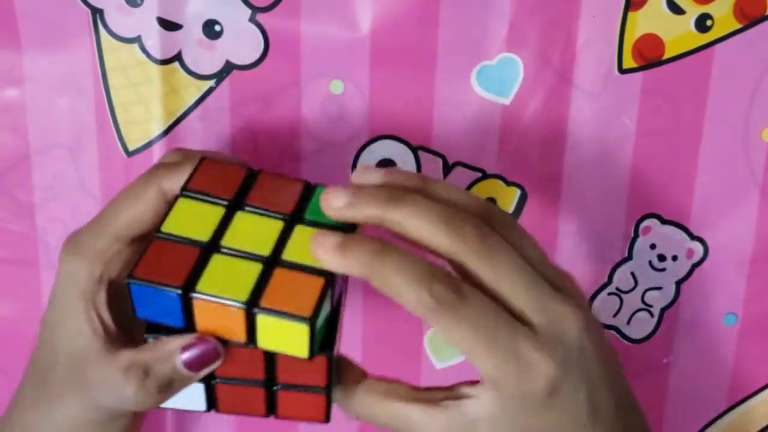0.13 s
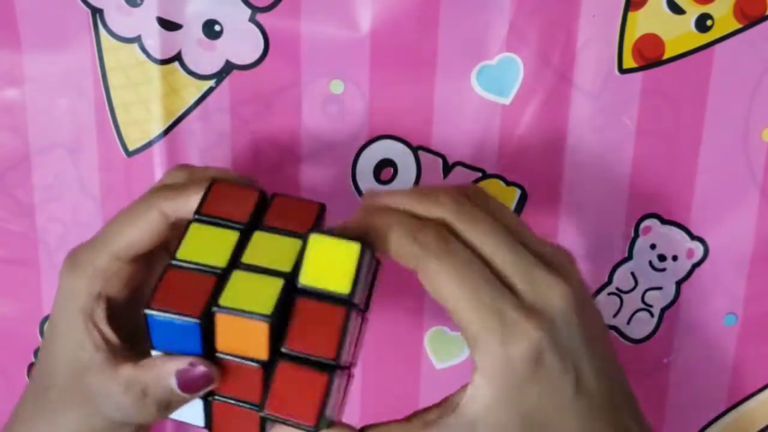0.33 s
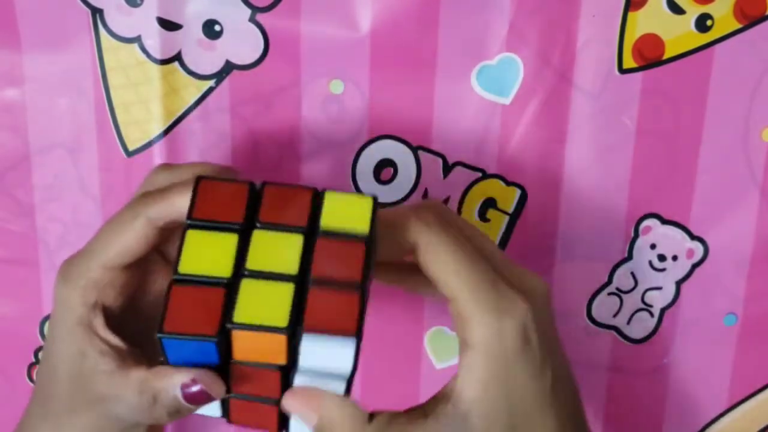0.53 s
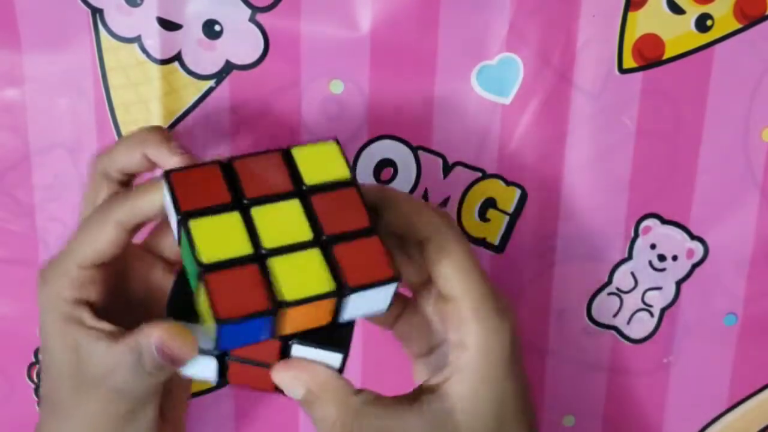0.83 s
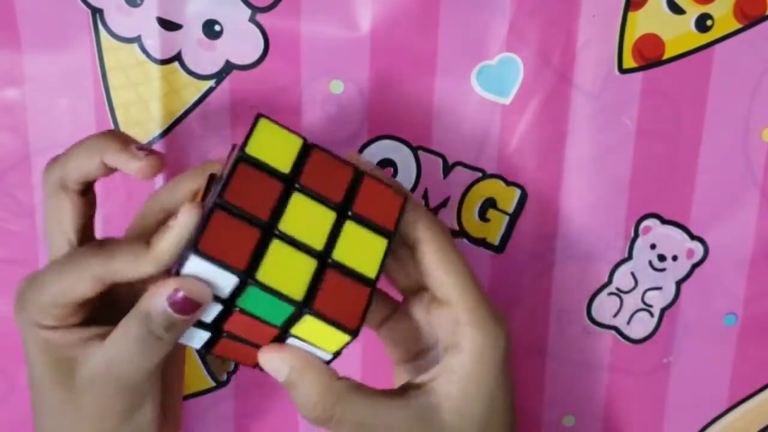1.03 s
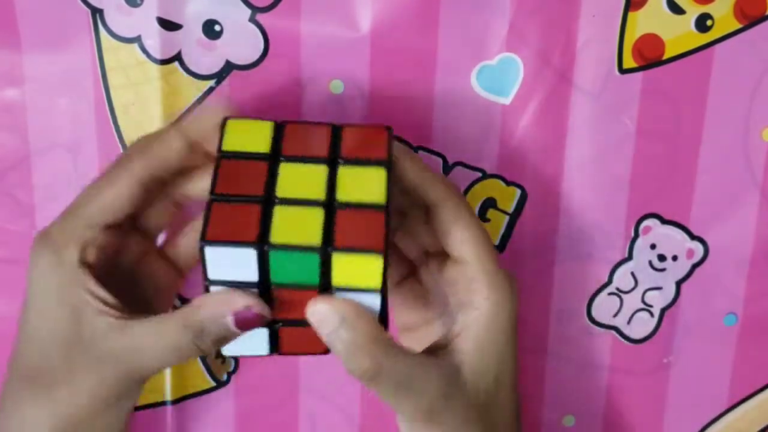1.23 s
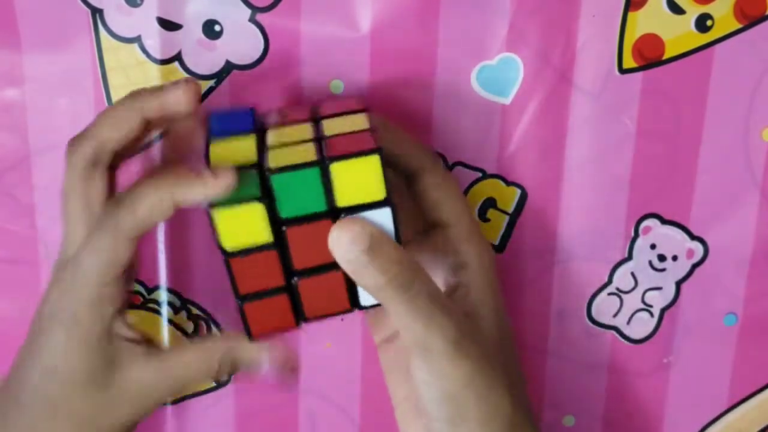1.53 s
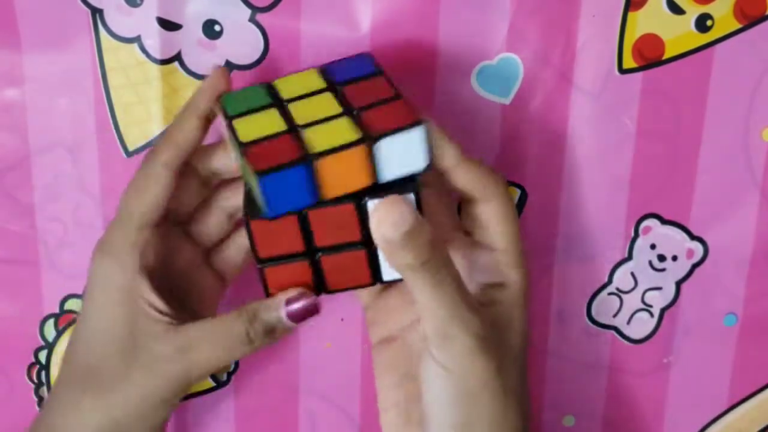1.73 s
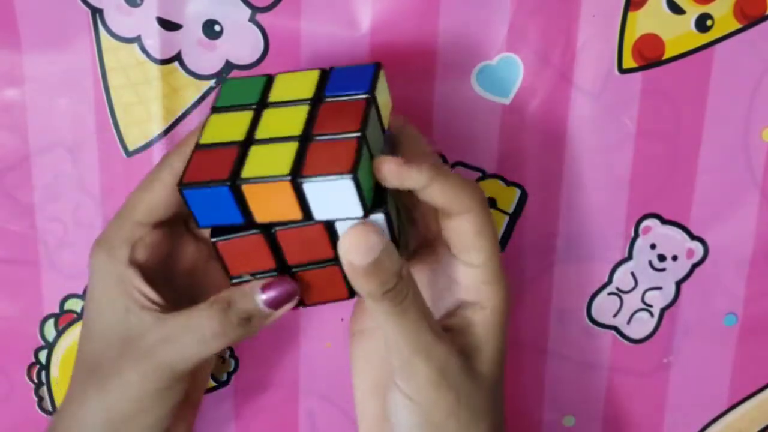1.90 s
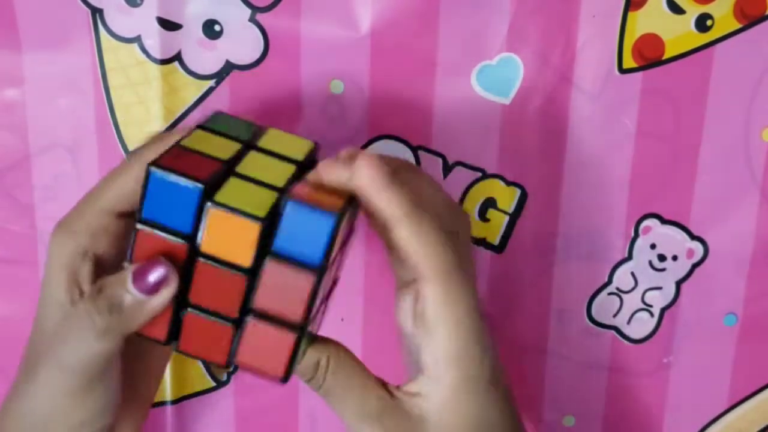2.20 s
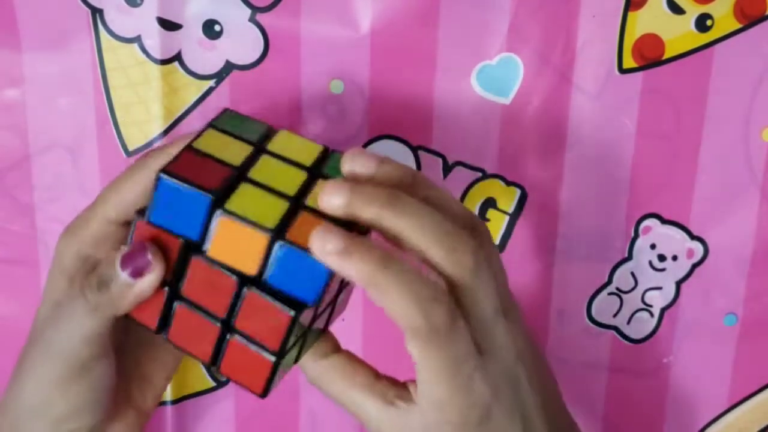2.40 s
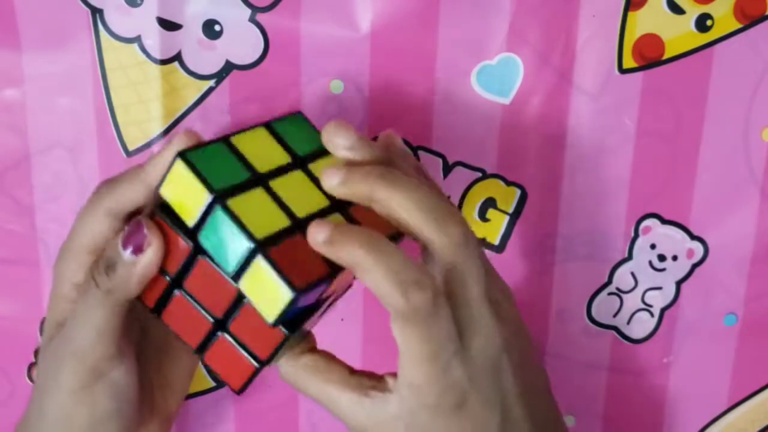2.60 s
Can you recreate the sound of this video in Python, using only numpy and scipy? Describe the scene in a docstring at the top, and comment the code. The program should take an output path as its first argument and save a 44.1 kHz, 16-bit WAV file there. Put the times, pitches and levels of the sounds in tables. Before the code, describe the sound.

A plastic puzzle cube is twisted close to the microphones in a small room. Its loose pieces clack in quick runs, pause briefly, then rattle more busily with light scraping. Hands rustle softly over a faint low hum.

```python
"""Twisting a plastic puzzle cube

The cube is turned by hand close to two microphones in a small room. Its loose pieces knock together
in quick runs. Each knock is a scatter of tiny contacts that rings the whole body, the hollow core,
the shells of the pieces and their hard edges. The layers rub between knocks, and now and then a piece
snaps into its seat. The hands rustle softly; a low hum, rumble and faint hiss lie underneath."""
import sys
import numpy as np
from scipy import signal
from scipy.fft import rfft, irfft, next_fast_len
from scipy.io import wavfile

SR = 44100
rng = np.random.default_rng(int(sys.argv[2]) if len(sys.argv) > 2 else 0)


def unload_wav(signal):
    """Save mono or channel-first audio to the path in sys.argv[1] as 16-bit WAV at rate SR, clipped to [-1, 1]."""
    wavfile.write(
        sys.argv[1],
        SR,
        np.round(np.clip(np.atleast_2d(signal).T, -1, 1) * 32767).astype(np.int16),
    )


N = 121275
T = np.arange(N) / SR

# tones of the electric hum: (frequency [Hz], level [dB])
HUM_TONES = [(49.5, -60.5), (141, -82.5)]
# colour of the rumble, from low to high: (frequency [Hz], relative level [dB])
RUMBLE_COLOUR = [(20, -5), (33, 1), (49, 12), (62, 6.5), (85, 1.5), (120, -12.5), (200, -20), (400, -47.5)]
# colour of the hiss: (frequency [Hz], relative level [dB])
HISS_COLOUR = [(150, 6.5), (400, -1), (900, -9), (1500, -2.5), (2500, 3), (3100, -12), (4500, -17),
               (8000, -36), (12000, -17.5), (16000, -21)]
# the hands shift their grip: (time [s], half length [s], level [dB])
GRIP_SHIFTS = [(0.647, 0.042, -65.5), (0.806, 0.068, -64.5), (1.272, 0.05, -64.5), (2.641, 0.046, -60)]
# colour of their rustle: (frequency [Hz], relative level [dB])
RUSTLE_COLOUR = [(60, -15), (140, 17.5), (200, 2), (320, -7.5), (700, -15), (2000, -48)]
# the room's echo: (frequency [Hz], level [dB], time to fade by 60 dB [s])
ROOM_BANDS = [(300, 3, 0.36), (730, 1, 0.92), (1640, -11, 0.44), (3100, -5.5, 0.4), (5500, -5.5, 0.44),
              (10400, -8.5, 0.49), (15500, -4, 0.38)]
# colour of the two microphones: (frequency [Hz], left gain [dB], right gain [dB])
MIC_COLOUR = [(487, -3, -8), (1370, 3.5, 1), (2450, 4, -2.5), (4390, -5.5, -9), (6080, 3, -4),
              (7560, 3.5, -10.5), (8730, -2.5, 1), (10230, -2, 6), (12100, 1.5, 3), (15900, -6, -8)]
# low ringing tones, or modes, of the whole cube: (frequency [Hz], relative level [dB], fade time [s])
BODY_MODES = [(518, -18, 0.039), (795, -5, 0.015), (935, -0.5, 0.0096), (1107, 2, 0.011)]
# ring of the hollow core: (frequency [Hz], relative level [dB], fade time [s])
HOLLOW_MODES = [(1258, -7, 0.0097), (1416, 1, 0.0077), (1642, 2.5, 0.0059), (1963, -0.5, 0.0056)]
# ring of the pieces' shells: (frequency [Hz], relative level [dB], fade time [s])
SHELL_MODES = [(2168, -0.5, 0.0024), (2624, -3, 0.0058), (2944, 1.5, 0.0036), (3545, -2.5, 0.006),
               (4060, -8, 0.0039)]
# ring of their hard edges: (frequency [Hz], relative level [dB], fade time [s])
EDGE_MODES = [(4470, -2.5, 0.0026), (6120, -1.5, 0.0022), (6710, -2, 0.0026), (9870, 1, 0.0018),
              (10630, 1.5, 0.0015), (11940, 3, 0.0015), (13270, 6, 0.0011), (15040, 3.5, 0.0014)]
# the body's ring against the hollow's, as the grip changes: (time [s], relative level [dB])
BODY_LEVELS = [(0.21, -15), (0.35, -13.5), (0.81, -15), (1.35, -12), (1.375, -8.5), (1.46, -4.5),
               (1.68, -15.5), (1.705, -7.5), (2.0, -8.5), (2.17, -12.5), (2.42, -15.5), (2.56, -7)]
# longer turns, where a layer scrapes on between knocks: (middle time [s])
SLIDE_TIMES = [1.38, 1.7, 2.09, 2.51]
# pieces snap into their seats: (time [s], frequency [Hz], fade time [s], relative level [dB])
SEAT_SNAPS = [(0.6064, 3100, 0.0065, -51.5), (1.7018, 3730, 0.0043, -28.5), (1.8131, 3200, 0.0045, -27.5),
              (2.1961, 13200, 0.0011, -32), (2.4675, 10400, 0.0023, -41.5)]
# knocks of the pieces, with relative levels: (time [s], scatter length [s],
# pitch the hollow leans toward [Hz], hollow level [dB], shell level [dB], edge level [dB])
PIECE_KNOCKS = [(0.119, 0.0012, 1510, -72, -81, -74), (0.1606, 0.0011, 1710, -53.5, -59, -72),
                (0.2113, 0.0018, 1470, -35, -36, -38.5), (0.243, 0.0009, 1620, -45.5, -81, -78),
                (0.3075, 0.0029, 1810, -43.5, -44.5, -55), (0.3194, 0.002, 1570, -41.5, -53, -62),
                (0.3232, 0.0009, 1720, -32.5, -40, -41), (0.3258, 0.0024, 1730, -45, -38, -34.5),
                (0.3301, 0.00093, 1680, -55, -52, -38), (0.338, 0.00062, 1496, -26.5, -34, -31.5),
                (0.3412, 0.0016, 1590, -51, -28, -33), (0.3466, 0.0018, 1530, -28.5, -32.5, -43),
                (0.35, 0.0024, 1640, -35.5, -48, -30), (0.4511, 0.0017, 1500, -45.5, -49.5, -46.5),
                (0.4549, 0.0019, 1460, -43.5, -48, -44.5), (0.5345, 0.0017, 1410, -48, -59, -67),
                (0.583, 0.0015, 1500, -45, -53.5, -54.5), (0.6078, 0.00034, 1514, -46, -48, -48.5),
                (0.676, 0.0013, 1630, -59, -63.5, -69), (0.7973, 0.0052, 1640, -53.5, -62, -56),
                (0.8157, 0.0032, 1880, -33.5, -41.5, -37.5), (0.8381, 0.0014, 1590, -56, -49, -95),
                (0.848, 0.0017, 1570, -40.5, -40.5, -42), (0.9454, 0.0038, 1870, -37, -41.5, -41.5),
                (0.9495, 0.0015, 1840, -48.5, -55, -68), (0.9565, 0.001, 1680, -41, -54, -41.5),
                (0.963, 0.0016, 1440, -42, -46.5, -37.5), (0.9816, 0.0019, 1560, -47, -51, -53),
                (1.2512, 0.0012, 1850, -59.5, -68, -61.5), (1.2917, 0.0013, 1800, -55, -67, -56.5),
                (1.3239, 0.0027, 1930, -39.5, -48, -47.5), (1.3502, 0.0013, 1550, -35.5, -45.5, -40),
                (1.358, 0.0026, 1750, -41, -44, -45), (1.3733, 0.0017, 1510, -36, -35.5, -37),
                (1.383, 0.0024, 1590, -44.5, -49, -43.5), (1.4135, 0.0065, 1530, -49.5, -52, -52),
                (1.4372, 0.0012, 1810, -40, -37.5, -42), (1.4609, 0.0011, 1180, -46.5, -55, -52),
                (1.547, 0.005, 1510, -55, -62, -55.5), (1.5783, 0.00067, 1560, -48.5, -62, -58),
                (1.598, 0.001, 1790, -41.5, -44, -56), (1.6007, 0.0012, 1710, -39, -46.5, -55),
                (1.6409, 0.0053, 1670, -42, -48, -50), (1.6875, 0.0038, 1620, -34, -39, -35.5),
                (1.6933, 0.0038, 1380, -38, -43, -35), (1.7013, 0.00073, 1386, -30.5, -31.0, -33),
                (1.7159, 0.0035, 1395, -35.5, -35, -36), (1.7281, 0.0026, 1440, -40, -44, -40),
                (1.783, 0.0035, 1460, -49, -50.5, -55), (1.8125, 0.0014, 1500, -38.5, -33.5, -34),
                (1.8328, 0.0018, 1550, -47.5, -58, -48.5), (1.9157, 0.0024, 1490, -49.5, -45, -67),
                (1.9536, 0.0027, 1360, -52, -55, -62), (1.9941, 0.0036, 1150, -53, -61.5, -71),
                (2.0563, 0.0041, 1980, -36, -42.5, -38.5), (2.059, 0.0037, 1350, -35, -34, -43),
                (2.0867, 0.0037, 1500, -40, -44, -47), (2.1397, 0.0024, 1500, -53, -54, -71),
                (2.1667, 0.0026, 1630, -38.5, -41, -47), (2.1961, 0.001, 1670, -46, -43, -30.5),
                (2.255, 0.0043, 1550, -46.5, -55.5, -52.5), (2.31, 0.00092, 1250, -50, -50.5, -55),
                (2.4178, 0.0034, 1660, -37, -44.5, -42), (2.458, 0.0059, 1460, -40.5, -41, -50),
                (2.4669, 0.0011, 1630, -46.5, -56, -33.5), (2.4701, 0.0012, 1640, -38, -43.5, -47),
                (2.4891, 0.00087, 1460, -48, -50, -60), (2.5055, 0.0054, 1410, -44, -59, -50),
                (2.5293, 0.0021, 1830, -48, -54, -50), (2.5392, 0.0013, 1410, -45, -50, -95),
                (2.547, 0.0016, 1460, -45, -50, -56), (2.5561, 0.0034, 1630, -50.5, -47.5, -45),
                (2.6906, 0.0032, 1800, -54.5, -60.5, -73)]

RUMBLE_DB, HISS_DB = -55.5, -68
ROOM_DELAY_S, EARLY_ECHO_DB, EARLY_ECHO_S = 0.0014, -0.5, 0.011
RUB_DB, GRAINS_PER_S, GRAIN_SPREAD_DB = -60.5, 1200, 6.5
RUB_REACH_S, RUB_FOLLOWS = 0.0055, 0.87   # rubbing gains 0.87 dB for each dB of a nearby knock
RUB_BODY_DB, RUB_SHELL_DB, RUB_EDGE_DB = 5.5, -7, -8
SLIDE_S, SLIDE_DB = 0.048, -53
CONTACTS_PER_S, CONTACT_SPREAD_DB, MODE_SPREAD_DB = 9000, -0.5, 1.5
RUN_UP_S, BLOW_SHARE, BLOW_DB = .007, 0.21, 8.5   # the main contact; shares are of the scatter length
LEAD_SHARE, LEAD_DB, CHATTER_SHARE, CHATTER_DB = .45, -2, 1.05, -2.5
HOLLOW_HZ, PITCH_FOLLOWS = 1612, 0.45   # the hollow's usual pitch, and how far it leans away
PIECE_SPREAD = 0.061   # the pieces differ in pitch by up to this share
HOLLOW_DB, SHELL_DB, EDGE_DB = -0.32, 3, -1.3
HOLLOW_SIDE_DB, SHELL_SIDE_DB, EDGE_SIDE_DB = -38, -8.5, 1   # higher: left and right differ more
KNOCK_S = .003   # a click's level is set as if all its energy fell within this time
SNAP_ROOM_DB, CUTOFF_HZ = -43, 16400


def from_db(db):
    """Turn decibels into a number to multiply by."""
    return 10 ** (np.asarray(db) / 20)


def unit_power(x):
    """Scale a sound to an average power of 1."""
    return x / np.sqrt(np.mean(x ** 2) + 1e-20)


def at_hz(table, hz, column=1):
    """Read a table between its rows, with every octave equally wide."""
    rows = np.array(table)
    return np.interp(np.log(np.maximum(hz, 1)), np.log(rows[:, 0]), rows[:, column])


def noise(colour, alike):
    """Stereo noise of a given colour; alike runs from 0 (unrelated sides) to 1 (the same)."""
    gains = from_db(at_hz(colour, np.fft.rfftfreq(N, 1 / SR)))
    mid, side = irfft(rfft(rng.standard_normal((2, N))) * gains, N)
    return unit_power(np.sqrt(1 + alike) * mid + np.sqrt(1 - alike) * side * [[1], [-1]])


def background():
    """Steady electric hum, low rumble and faint hiss."""
    hum = sum(from_db(db) * np.sqrt(2) * np.sin(2 * np.pi * (hz * T + rng.random()))
              for hz, db in HUM_TONES)
    rumble = from_db(RUMBLE_DB) * noise(RUMBLE_COLOUR, alike=0.92)
    hiss = from_db(HISS_DB) * noise(HISS_COLOUR, alike=0.25)
    return hum + rumble + hiss


def hands():
    """Soft swells of low rustle as the hands shift on the cube."""
    swell = sum(from_db(db) * np.exp(-.5 * ((T - s) / width) ** 2) for s, width, db in GRIP_SHIFTS)
    return swell * noise(RUSTLE_COLOUR, alike=0.99)


def room_echo(size=32768):
    """Dense reflections, strongest at first; each band of frequencies fades at its own speed."""
    t, hz = np.arange(size) / SR, np.fft.rfftfreq(size, 1 / SR)
    white, out = rfft(rng.standard_normal((2, size))), 0
    centres = np.log([row[0] for row in ROOM_BANDS])
    early_boost = 1 + from_db(EARLY_ECHO_DB) * np.exp(-t / EARLY_ECHO_S)
    for share, (_, db, fade_s) in zip(np.eye(len(ROOM_BANDS)), ROOM_BANDS):
        band = irfft(white * np.interp(np.log(hz + 1), centres, share))
        fade = np.exp(-np.log(1000) * t / fade_s) * (t > ROOM_DELAY_S) * early_boost
        out = out + from_db(db) * band * fade / np.sqrt(np.sum(fade ** 2))
    return out


def microphones(cube):
    """Two microphones hear the cube directly and as echo. Its rows: left, right, into the room."""
    size = next_fast_len(N + 32768)
    hz, spectrum = np.fft.rfftfreq(size, 1 / SR), rfft(cube, size)
    colour = from_db([at_hz(MIC_COLOUR, hz, column=1), at_hz(MIC_COLOUR, hz, column=2)])
    echo = spectrum[2] * rfft(room_echo(), size)
    return irfft(colour * (spectrum[:2] + echo), size)[:, :N]


def ring(contacts, modes, pitch=1, spread_db=0):
    """Each contact starts a set of fading tones, whose strengths may vary by chance."""
    out = 0
    for k, (hz, db, fade_s) in enumerate(modes):
        decay, angle = from_db(-60 / (fade_s * SR)), 2 * np.pi * hz * pitch / SR   # per sample
        gain = from_db(db + spread_db * rng.standard_normal()) * (-1) ** k
        feedback = [1, -2 * decay * np.cos(angle), decay * decay]
        out = out + gain * signal.lfilter([1, 0, -1], feedback, contacts + 1e-18)
    return out


def body_db(s):
    """How strongly the grip lets the body ring at a given time."""
    return np.interp(s, *np.transpose(BODY_LEVELS))


def rubbing():
    """Sliding layers catch in faint grains, around the knocks and through the longer turns."""
    near_knocks = sum(from_db(2 * RUB_FOLLOWS * hollow_db) * np.exp(-np.abs(T - s) / RUB_REACH_S)
                      for s, _, _, hollow_db, _, _ in PIECE_KNOCKS)
    in_turns = sum(from_db(2 * RUB_FOLLOWS * SLIDE_DB) * np.exp(-.5 * ((T - s) / SLIDE_S) ** 2)
                   for s in SLIDE_TIMES)
    sizes = from_db(GRAIN_SPREAD_DB * np.minimum(rng.exponential(1, N), 3)) * rng.choice([-1, 1], N)
    grains = (rng.random(N) < GRAINS_PER_S / SR) * sizes * np.sqrt(near_knocks + in_turns)
    parts = [(BODY_MODES, RUB_BODY_DB + body_db(T)), (HOLLOW_MODES, 0),
             (SHELL_MODES, RUB_SHELL_DB), (EDGE_MODES, RUB_EDGE_DB)]
    return sum(from_db(RUB_DB + db) * unit_power(ring(grains, modes)) for modes, db in parts)


def snaps(size=2048):
    """A piece snaps into its seat with one clear ring and almost no echo."""
    out = np.zeros(N + size)
    for s, hz, fade_s, db in SEAT_SNAPS:
        mode, start = [(hz, 0, fade_s)], int(s * SR)
        click = ring(ring(signal.unit_impulse(size), mode), mode)   # ringing twice makes it swell first
        out[start:start + size] += from_db(db) * np.sqrt(KNOCK_S * SR / size) * unit_power(click)
    return out[:N] * from_db([[0], [0], [SNAP_ROOM_DB]])


def scatter(length, size=2048):
    """The contacts of one knock: building friction, a short crunch with the main blow, dying chatter."""
    t = np.arange(size) / SR - RUN_UP_S + BLOW_SHARE * length
    rise = from_db(LEAD_DB) * np.exp(-np.abs(t) / (LEAD_SHARE * length))
    chatter = from_db(CHATTER_DB) * np.exp(-np.abs(t - length) / (CHATTER_SHARE * length))
    touches = rng.random(size) < CONTACTS_PER_S / SR
    strengths = from_db(CONTACT_SPREAD_DB * np.clip(rng.standard_normal(size), -2, 2))
    contacts = touches * strengths * rng.choice([-1, 1], size)
    contacts[int(RUN_UP_S * SR)] = from_db(BLOW_DB)
    return contacts * np.where(t < 0, rise, np.where(t < length, 1, chatter))


def knocks(size=2048):
    """Loose pieces collide, ringing the body, hollow, shells and edges together."""
    out = np.zeros((3, N + size))
    blow = signal.unit_impulse(size, int(RUN_UP_S * SR))
    for s, length, hz, hollow_db, shell_db, edge_db in PIECE_KNOCKS:
        start = int((s - RUN_UP_S) * SR)
        mid, side = scatter(length), scatter(length)   # what left and right share, and how they differ
        core_pitch = (hz / HOLLOW_HZ) ** PITCH_FOLLOWS
        piece_pitch = 1 + rng.uniform(-PIECE_SPREAD, PIECE_SPREAD)
        parts = [(BODY_MODES, core_pitch, hollow_db + body_db(s), HOLLOW_SIDE_DB),
                 (HOLLOW_MODES, core_pitch, hollow_db + HOLLOW_DB, HOLLOW_SIDE_DB),
                 (SHELL_MODES, piece_pitch, shell_db + SHELL_DB, SHELL_SIDE_DB),
                 (EDGE_MODES, piece_pitch, edge_db + EDGE_DB, EDGE_SIDE_DB)]
        for modes, pitch, db, side_db in parts:
            contacts = mid + from_db(side_db) * side * [[1], [-1]]
            left, right = ring(contacts, modes, pitch, MODE_SPREAD_DB)
            into_room = ring(blow, modes, pitch)
            rings = np.array([unit_power(x) for x in (left, right, into_room)])
            out[:, start:start + size] += from_db(db) * np.sqrt(KNOCK_S * SR / size) * rings
    return out[:, :N]


def scene():
    """The cube in its room, the hands and the background."""
    return microphones(knocks() + snaps() + rubbing()) + hands() + background()


def record(dry):
    """A steep filter cuts off the very highest treble."""
    return signal.sosfilt(signal.ellip(10, .2, 70, CUTOFF_HZ, fs=SR, output="sos"), dry)


dry = scene()
out = record(dry)
unload_wav(out)
```